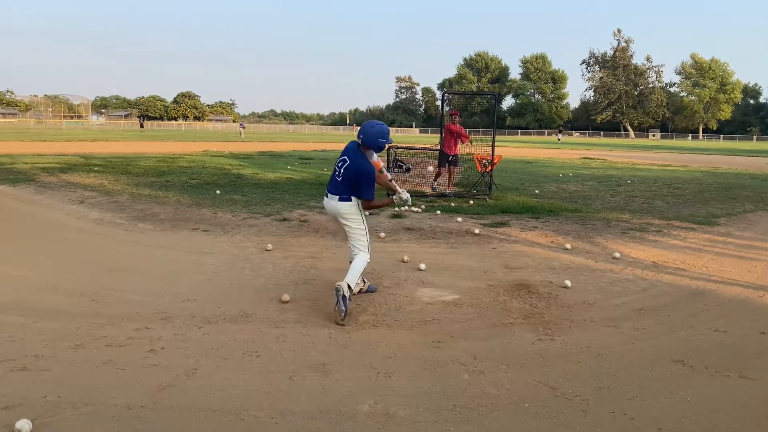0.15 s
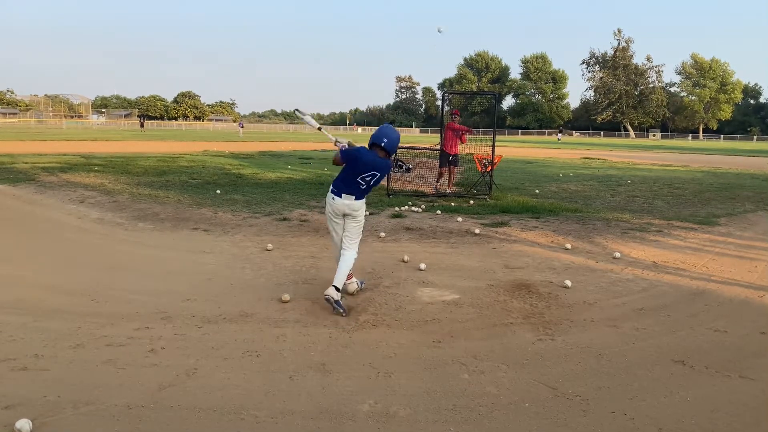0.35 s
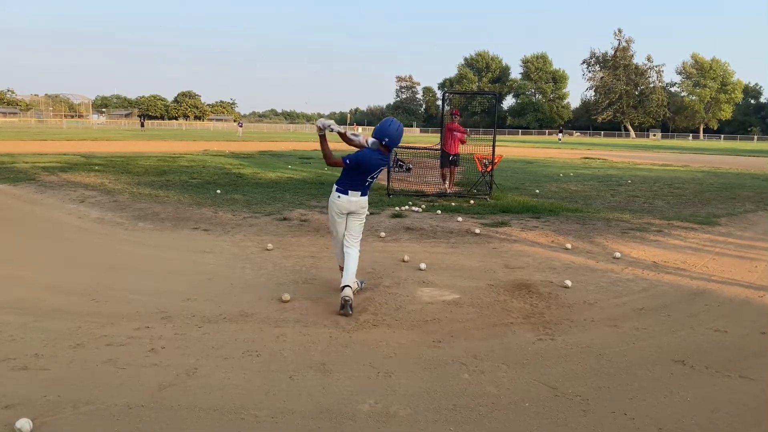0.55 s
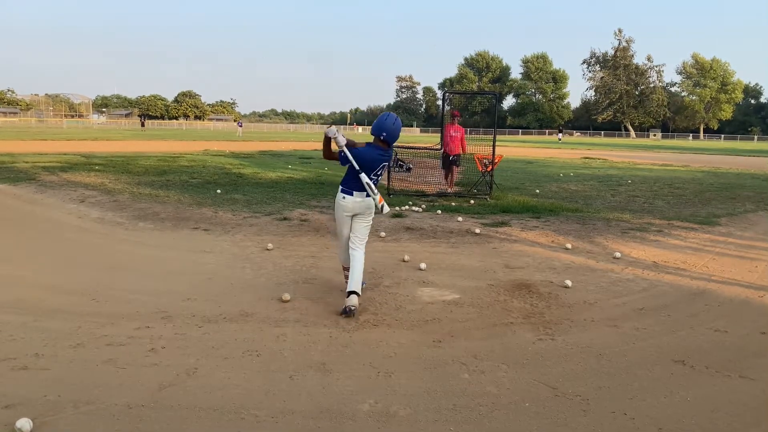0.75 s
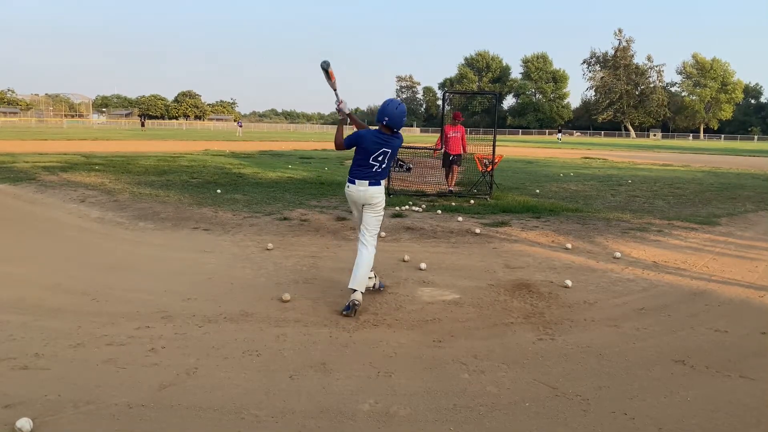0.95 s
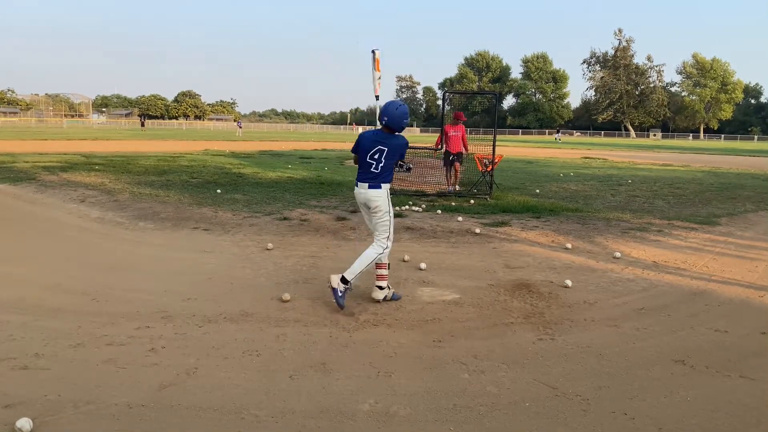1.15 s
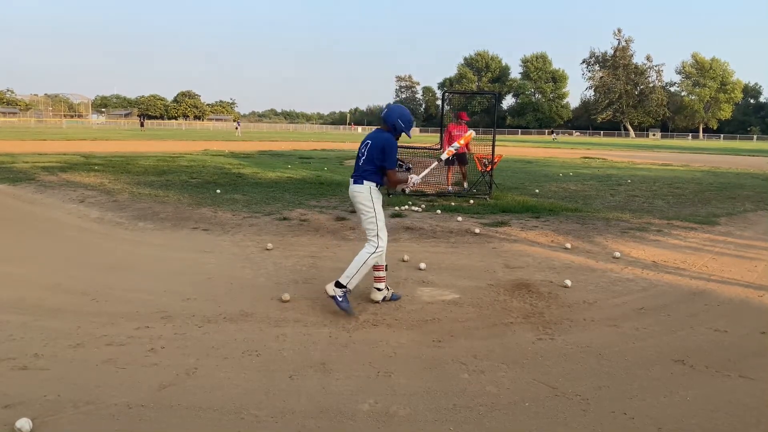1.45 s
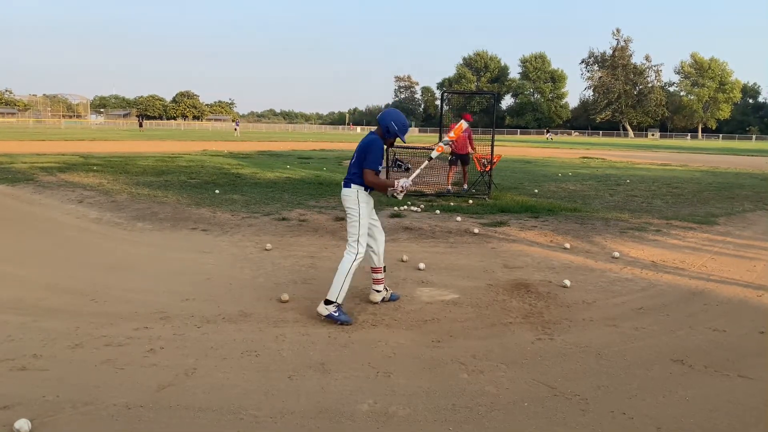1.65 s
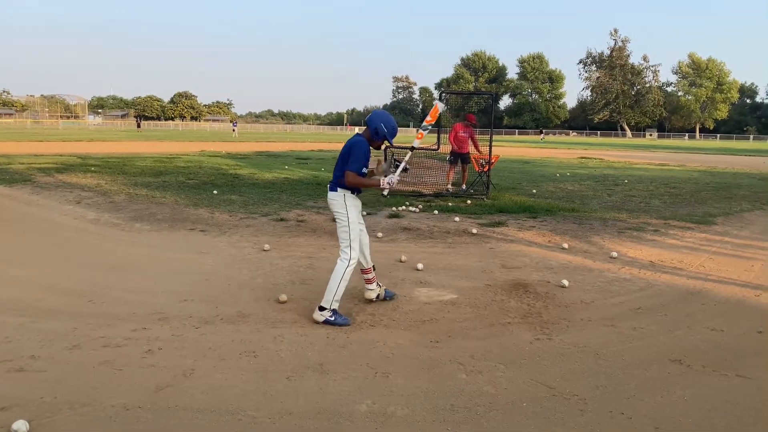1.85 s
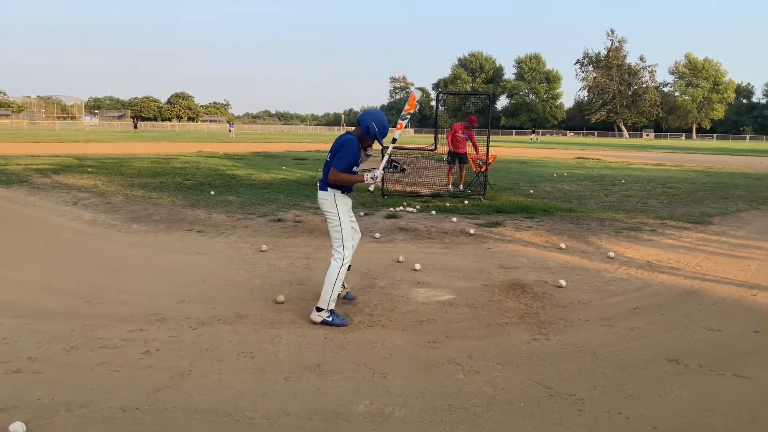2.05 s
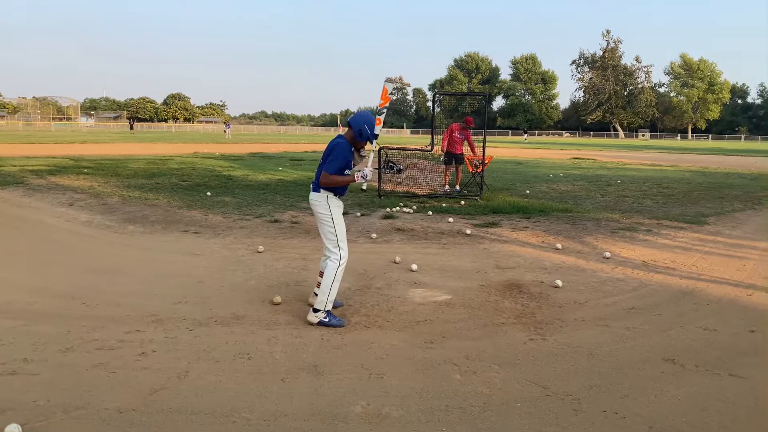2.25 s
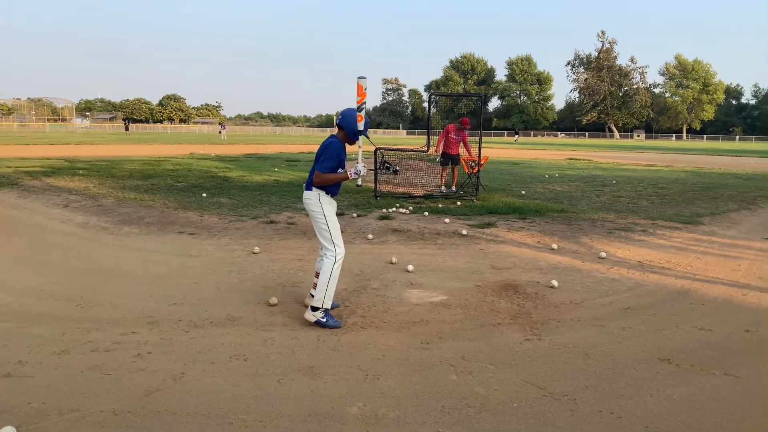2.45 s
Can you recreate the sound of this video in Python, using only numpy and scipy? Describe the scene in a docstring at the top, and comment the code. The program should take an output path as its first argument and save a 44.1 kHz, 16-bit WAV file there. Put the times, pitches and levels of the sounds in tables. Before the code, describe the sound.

A metal baseball bat hits a ball with a loud, sharp ping after gritty shoe scuffs; brief echoes scatter off trees and fences, a small dull rap follows, then faint footwork on dirt over distant traffic rumble.

```python
"""Shoes scuff and knock gritty dirt as filtered grains and short tones, before and after a hit.
A hollow metal bat strikes a ball: decaying modes ping over a sharp crack and a low thump. The swing lowers the
pitch for the listener behind and raises it in the echoes from trees and fences ahead.
The bat then raps the batter's back, which smothers its ring. Throughout, bands of noise make
far traffic rumble and a faint field hiss, and narrow noise makes a low drone."""
import sys
import numpy as np
from scipy import signal
from scipy.fft import rfft, irfft
from scipy.io import wavfile

SR = 44100
rng = np.random.default_rng(int(sys.argv[2]) if len(sys.argv) > 2 else 0)


def transcribe(signal):
    """Save signal, clipped to [-1, 1], as a 16-bit WAV file at the path in sys.argv[1]."""
    frames = np.atleast_2d(signal).T
    limited = np.clip(frames, -1, 1)
    pcm = np.round(limited * 32767).astype(np.int16)
    wavfile.write(sys.argv[1], SR, pcm)


N = 114660  # samples

AT_REST = .992  # pitch ratio with almost no Doppler shift


def amp(db):
    """Level in decibels becomes a pressure ratio."""
    return 10 ** (np.asarray(db) / 20)


def rms_one(x):
    """Scaling by the root mean square sets unit power."""
    return x / np.sqrt(np.mean(x ** 2) + 1e-20)


def level(rows):
    """An envelope linear in decibels between (s, dB) rows, silent outside them."""
    s, db = np.transpose(rows)
    return amp(np.interp(np.arange(N) / SR, s, db, left=-200, right=-200))


def at_hz(points, hz):
    """A spectral curve interpolated over log frequency, as pitch is heard."""
    table = np.array(points)
    return np.interp(np.log(hz + 1), np.log(table[:, 0]), table[:, 1])


def butter(x, hz, kind, order=2):
    """A Butterworth filter: maximally flat in its passband."""
    return signal.sosfilt(signal.butter(order, hz, kind, fs=SR, output="sos"), x)


def drift(rate_hz):
    """Slow random fluctuation: noise through two equal low-pass poles, unit spread."""
    step = 40  # samples between slow values
    r = np.exp(-2 * np.pi * rate_hz * step / SR)
    noise = rng.standard_normal(N // step + 2002)
    slow = signal.lfilter([1], [1, -2 * r, r * r], noise)[2000:]
    return np.interp(np.arange(N) / step, np.arange(len(slow)), rms_one(slow))


def place(sound, s):
    """Superposition in time: a short sound starts at s seconds."""
    out, i = np.zeros(N + len(sound)), max(int(s * SR), 0)
    out[i:i + len(sound)] = sound
    return out[:N]


def bat():
    """Radiation and scattering of the hit, then the rap on the back, with Doppler shift by direction."""
    hit_s, rap_s, thump_delay_s = .2331, .6919, .0031
    swing_m_s, sound_m_s, contact_s = 11.8, 343, .0018
    rap_wash_db, sideways_db = -23.5, -13
    shelf_hz, upper_db, edge_hz = 2000, -.5, 3100
    # Echoes from ahead. Each row: arrival in seconds, level in dB before filtering.
    ahead = [(0.258, -35.5), (0.301, -43.5), (.33, -43.5), (.365, -46), (0.384, -51), (.41, -47.5),
             (.46, -51.5), (.49, -52.5), (0.519, -55.5), (.545, -67), (.75, -75.5), (0.809, -62),
             (.86, -75), (.92, -64.5), (1.0, -77.5), (1.198, -75)]
    # Echoes from the sides and behind. Each row: arrival in seconds, level in dB before filtering.
    around = [(0.241, -32), (0.279, -76), (.32, -58), (.4, -63), (.5, -65), (0.581, -61), (0.621, -80.5),
              (0.9, -74)]
    # Crack scattered by leaves and chain-link. Each row: arrival in seconds, level in dB.
    hit_wash = [(0.235, -30), (.25, -44.5), (.28, -45), (0.333, -56.5), (.45, -60.5), (0.601, -74.5),
                (.9, -115)]
    # Colour of that scattered crack. Each row: frequency in Hz, relative level in dB.
    wash_colour = [(400, -6.5), (1200, -7.5), (2500, 3.5), (5000, -7.5), (10000, -16), (14000, -26.5)]

    away, towards = 1 - swing_m_s / sound_m_s, 1 + swing_m_s / sound_m_s
    ping = ring(0, away, contact_s)
    hit = place(grounded(ping + crack(12.5)), hit_s)
    near = hit + place(thump(), hit_s + thump_delay_s) + place(rap(), rap_s)

    onward = ring(0, towards, contact_s) + amp(sideways_db) * ring(0, AT_REST, contact_s)
    echoes = scatter(onward, ahead) + scatter(ping, around)
    echoes = echoes + (amp(upper_db) - 1) * butter(echoes, shelf_hz, "high", order=4)
    echoes = butter(echoes, edge_hz, "low", order=4)

    rap_wash = [(s - hit_s + rap_s, db + rap_wash_db) for s, db in hit_wash]
    wash = click(wash_colour)
    return ports(near) + echoes + scatter(wash, hit_wash) + scatter(wash, rap_wash)


def ring(column, shift, contact_s):
    """Modal superposition: the bat's modes swell as contact ends, then decay exponentially."""
    # Modes of the bat at rest. Each entry: frequency in Hz.
    mode_hz = [700, 995, 1416, 1947, 2172, 2686, 3268, 4003, 4650, 6100, 6548, 7520, 9730, 11346, 13500]
    # Damping of the same modes. Each entry: time in seconds to fall by 60 dB.
    mode_t60_s = [.025, .018, .1, .025, .035, .052, .039, .04, .009, .007, .025, .02, .006, .02, .01]
    # Strength of the same modes. Each row: level in dB on the ball, level in dB on the back.
    mode_db = [(-39, -22), (-3.5, -30), (-9, -26.5), (-19, -35.5), (-25.5, -32), (-4, -38), (-17.5, -44),
               (-18, -40.5), (-6.5, -37), (-50.5, -35), (-12, -41.5), (-19.5, -47), (-20, -46), (-33, -53),
               (-44.5, -49)]
    t = np.arange(SR // 4) / SR
    hz, t60, db = np.c_[mode_hz], np.c_[mode_t60_s], np.array(mode_db)[:, [column]]
    swell = (1 - np.exp(-t / contact_s * hz / hz[5])) ** 2  # higher modes swell sooner
    decay = amp(db - 60 * t / t60)
    return (decay * swell * np.sin(2 * np.pi * hz * shift * t)).sum(axis=0)


def crack(db):
    """Broadband impulsive radiation: a few snaps of alternating sign."""
    # Colour of one snap. Each row: frequency in Hz, relative level in dB.
    colour = [(250, -10.5), (500, -20.5), (800, 1), (1150, 12.5), (2000, -4), (4500, -2), (5500, -23.5),
              (8000, -22), (10000, -10), (12000, -23.5), (14000, -27)]
    # Train of snaps. Each row: time after contact in seconds, relative level in dB.
    snaps = [(0, -4.5), (.0009, 0.5), (.0017, 1.94)]
    one = click(colour)
    out = np.zeros(len(one))
    for k, (s, snap_db) in enumerate(snaps):
        out += (-1) ** k * amp(db + snap_db) * np.roll(one, int(s * SR))
    return out


def click(colour):
    """A minimum-phase impulse: the cepstrum folded to positive time gives a causal filter."""
    size = SR // 4
    log_gain = at_hz(colour, np.fft.rfftfreq(size, 1 / SR)) * np.log(10) / 20
    cepstrum = irfft(log_gain, size)
    cepstrum[1:size // 2] *= 2
    cepstrum[size // 2 + 1:] = 0
    return irfft(np.exp(rfft(cepstrum)), size)


def grounded(dry):
    """Ground reflection: a delayed copy, dulled by the dirt, joins the direct sound."""
    delay_s, bounce_db, dull_hz = .00225, -7.5, 5000
    lag = int(delay_s * SR)
    delayed = np.r_[np.zeros(lag), dry[:-lag]]
    return dry + amp(bounce_db) * butter(delayed, dull_hz, "low")


def thump():
    """Volume displacement: the squeezed ball pushes the air in a short boom of falling pitch."""
    start_hz, end_hz, peak_db = 356, 110, -19
    time_s = .0028  # time to the peak, and time constant of the pitch fall
    t = np.arange(SR // 10) / SR
    hz = end_hz + (start_hz - end_hz) * np.exp(-t / time_s)
    pulse = t / time_s * np.exp(1 - t / time_s)
    return amp(peak_db) * pulse * np.sin(2 * np.pi * np.cumsum(hz) / SR)


def rap():
    """Contact damping: the bat rings briefly, then the back absorbs it as the bat presses in."""
    swell_s, free_s, body_t60_s, most_damping_db = .0002, .004283, .014, 24
    t = np.arange(SR // 4) / SR
    knock = ring(1, AT_REST, swell_s) + butter(crack(-11), 620, "high")
    damping_db = 60 * np.maximum(t - free_s, 0) / body_t60_s
    return knock * amp(-np.minimum(damping_db, most_damping_db))


def scatter(sound, rows):
    """Diffuse reflection: many small reflectors act as a noise impulse response."""
    noise = rng.standard_normal((3, N))
    answer = (noise[0] + 0.2 * noise[1:]) * level(rows)  # mostly alike left and right
    unit_energy = sound[None] / np.sqrt(np.sum(sound ** 2))
    return signal.fftconvolve(answer, unit_energy, axes=1)[:, :N]


def ports(x):
    """Interchannel difference: two close microphone ports hear their own level and phase."""
    # Balance of level. Each row: frequency in Hz, left minus right in dB.
    balance = [(300, -0.5), (700, 0.5), (1400, -2.5), (2700, -8), (4500, 3.5), (9000, -3.5), (14000, -2.7)]
    # Difference of phase. Each row: frequency in Hz, lag of the left in radians.
    phase = [(200, .35), (700, .4), (1400, .85), (2600, .65), (5000, .8), (10000, 1.45), (14000, 1.8)]
    hz = np.fft.rfftfreq(N, 1 / SR)
    half = amp(at_hz(balance, hz) / 2) * np.exp(-.5j * at_hz(phase, hz))
    return irfft(rfft(x) * np.array([half, 1 / half]), N)


def shoes():
    """Granular friction: each scuff crunches clumpy random grains in a quick swell and fade."""
    # Each row: start in seconds, length in seconds, level in dB, brightness in Hz.
    scuffs = [(.0, 0.28, -56, 3380), (0.019, .009, -42, 4100), (0.029, 0.044, -46, 1520),
              (0.069, 0.02, -44, 2530), (0.0778, 0.0043, -45, 4840), (0.083, .06, -51, 1892),
              (0.155, 0.0037, -49.5, 5900), (.163, 0.0021, -47.5, 5960), (0.187, 0.2, -49.5, 2480),
              (0.589, .013, -53, 2410), (0.76, 0.01, -61.5, 3500), (0.801, 0.0087, -61, 5920),
              (.946, 0.023, -59.5, 2690), (1.047, 0.065, -54, 2080), (1.111, 0.059, -68.5, 6820),
              (1.334, 0.02, -64, 7000), (1.621, 0.037, -56, 3200), (1.641, 0.035, -56.5, 2460),
              (1.672, 0.046, -64, 2400), (.118, .045, -49.5, 2305), (1.822, 0.0184, -60, 4200),
              (1.842, 0.035, -60, 1800), (2.189, .048, -67, 2500), (2.213, .022, -60, 3600),
              (2.376, 0.037, -63, 3030), (2.556, 0.041, -65.5, 3040)]
    grains_per_s, spread_db, clump_db = 7000, 3.0, 1.8
    attack = .1  # share of the length
    out, size = np.zeros(N), SR // 3
    t = np.arange(size) / SR
    for s, length, db, hz in scuffs:
        struck = rng.random(size) < grains_per_s / SR
        strength = amp(spread_db * np.minimum(rng.exponential(1, size), 4))
        grit = struck * strength * rng.choice([-1, 1], size)
        grit = grit * amp(clump_db * drift(80)[:size])
        body = butter(grit, [0.21 * hz, 0.87 * hz], "band")
        body = body + amp(-26) * butter(grit, 6500, "low", order=5)
        shape = np.minimum(t / length / attack, 1) * np.exp(-2.5 * (t / length) ** 2)
        scuff = shape * body
        scuff_rms = np.sqrt(np.sum(scuff ** 2) / np.sum(shape ** 2))
        out += place(amp(db) * scuff / scuff_rms, s)
    return out


def knocks():
    """Damped resonance: clods snap and heels knock, each ringing at three uneven pitches."""
    # Each row: start in seconds, starting level in dB, pitch in Hz, time in seconds to fall by 60 dB.
    blows = [(.0205, -27.5, 1590, .018), (.0315, -35, 786, 0.012), (.0485, -27, 865, 0.019),
             (.0725, -48, 1050, .012), (.587, -48, 1500, .012), (1.05, -50, 1310, 0.0082),
             (1.076, -33, 619, 0.011), (1.138, -60, 7000, .003), (1.625, -53.5, 960, 0.031),
             (1.826, -46, 716.5, 0.019), (2.155, -38.5, 374, 0.034), (2.22, -47, 906, .022)]
    spacing = .22  # octaves between tones, before chance shifts them
    out, t = np.zeros(N), np.arange(SR // 10) / SR
    chances = rng.uniform(-1, 1, (len(blows), 3))
    for (s, db, hz, t60), chance in zip(blows, chances):
        octaves = spacing * (np.arange(-1, 2) + chance / 2)
        tones = np.sin(2 * np.pi * hz * 2 ** octaves[:, None] * t).mean(axis=0)
        out += place(amp(db - 60 * t / t60) * tones, s)
    return out


def field():
    """Partly coherent third-octave noise: a faint hiss over lows that swell with the traffic."""
    # Spectrum of the field. Each row: frequency in Hz, relative level in dB per Hz.
    spectrum = [(12, -39), (20, -12.5), (48, -8.5), (85, -3.5), (149, -12), (538, -30), (722, -27.5),
                (1170, -36), (1790, -41.5), (2470, -37.5), (2980, -46), (4110, -42.5), (5980, -47),
                (6660, -50), (12000, -81.5), (15600, -106), (22000, -120)]
    # Swell of the rumble. Each row: time in seconds, level in dB, used relative to the mean row.
    rumble = [(0.0, -50), (0.09, -44), (0.22, -54), (0.44, -50.5), (0.61, -50.5), (1.5, -49.5),
              (1.64, -52.5), (1.95, -54.5), (2.23, -49), (2.6, -57)]
    # Left-right likeness. Each row: frequency in Hz, correlation (no unit).
    likeness = [(60, 0.95), (180, 0.85), (550, 0.2), (1650, -0.31), (4970, 0.02), (15000, 0.25)]
    # Balance of level. Each row: frequency in Hz, left minus right in dB.
    balance = [(950, -1.0), (1900, -1), (3800, 7.5), (7500, 8.5)]
    field_db, patchy_db, patchy_hz = -47, 1.5, 3.6

    out, edges = 0, 20 * 2 ** np.arange(0, 9.5, 1 / 3)
    white = rng.standard_normal((2, 2, N + SR // 2))
    swell = level(rumble) / amp(np.mean(np.array(rumble)[:, 1]))
    for k, (low, high) in enumerate(zip(edges, edges[1:])):
        # neighbouring bands use separate noise; the filter's first half second is dropped
        mid, side = butter(white[k % 2], [low, high], "band")[:, SR // 2:]
        hz = np.sqrt(low * high)
        alike = np.clip(at_hz(likeness, hz), -.9, 1)
        stereo = np.sqrt(1 + alike) * mid + np.sqrt(1 - alike) * side * [[1], [-1]]
        swell_share = 1 / (1 + (hz / 250) ** 2)
        gain = amp(at_hz(spectrum, hz) + patchy_db * drift(patchy_hz)) * swell ** swell_share
        pan = amp(at_hz(balance, hz) * np.array([[.5], [-.5]]))
        out = out + gain * pan * stereo
    return amp(field_db) * rms_one(out)


def hum():
    """Narrow-band noise: random beating within a few hertz makes a low drone waver."""
    centre_hz, width_hz, hum_db = 60, 6.6, -52
    band = [centre_hz - width_hz / 2, centre_hz + width_hz / 2]
    noise = butter(rng.standard_normal(N + SR), band, "band")
    return amp(hum_db) * rms_one(noise[SR:])


def scene():
    """Linear superposition of all the sources."""
    background = butter(field(), 39, "high", order=3) + hum()
    return bat() + shoes() + knocks() + background


def record(dry):
    """Compression and saturation: peaks lower a slowly recovering gain and are rounded; the top is cut."""
    threshold_db, share, recover_db_s = -10, .31, 9  # share: dB of reduction per dB over
    ceiling, cutoff_hz = 1.3, 16300
    t = np.arange(N) / SR
    peak_db = 20 * np.log10(np.abs(dry).max(axis=0) + 1e-9)
    over = np.maximum(peak_db - threshold_db, 0)
    held = np.maximum.accumulate(share * over + recover_db_s * t) - recover_db_s * t
    gain = amp(-signal.lfilter([.004], [1, -.996], held))  # smoothed reduction
    rounded = ceiling * np.tanh(dry * gain / ceiling)
    low_pass = signal.cheby2(12, 70, cutoff_hz, fs=SR, output="sos")
    return signal.sosfilt(low_pass, rounded)


dry = scene()
out = record(dry)
transcribe(out)
```